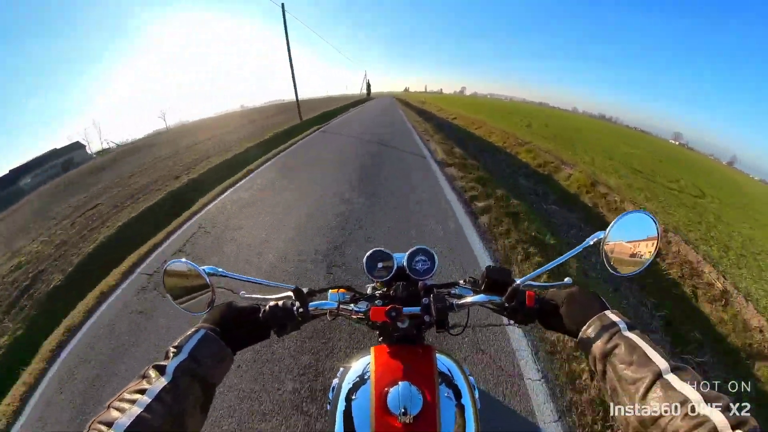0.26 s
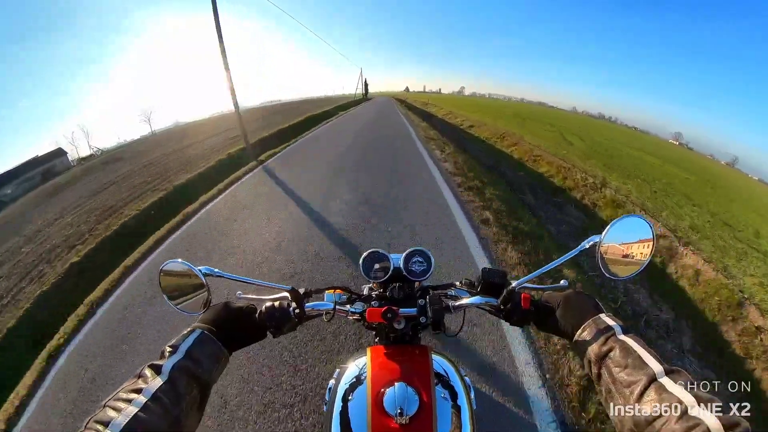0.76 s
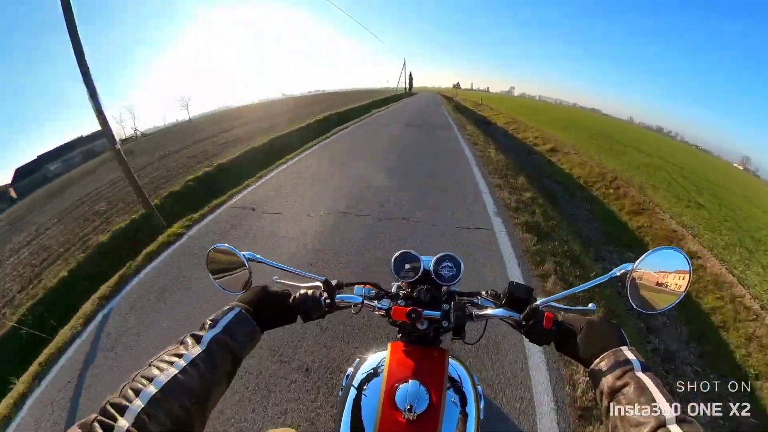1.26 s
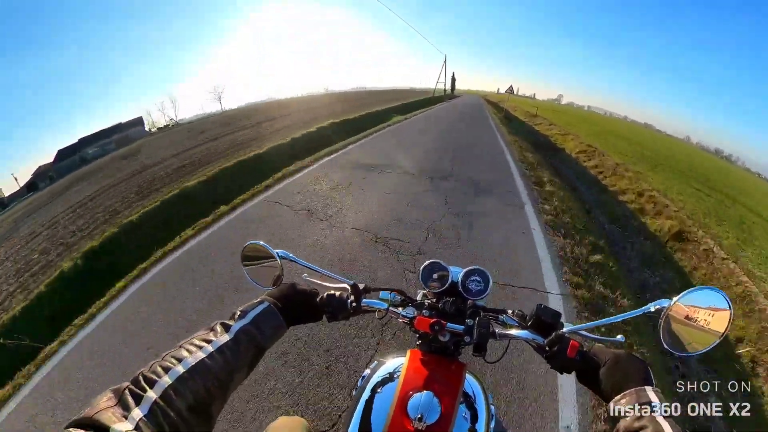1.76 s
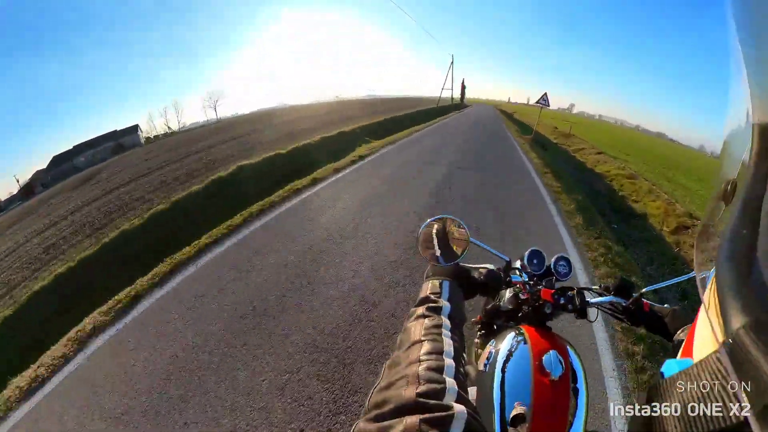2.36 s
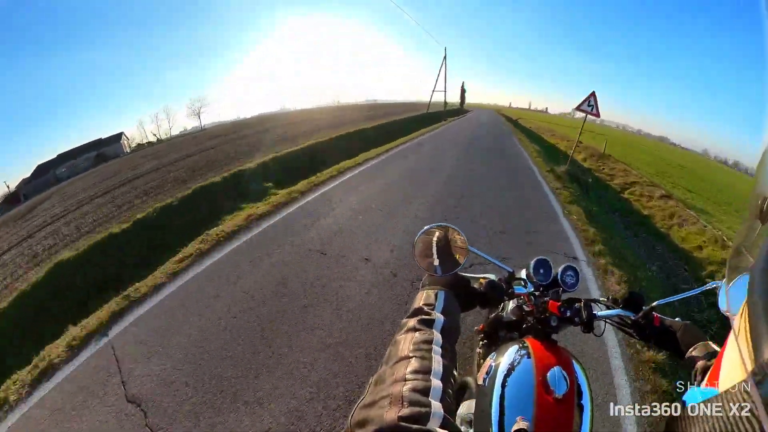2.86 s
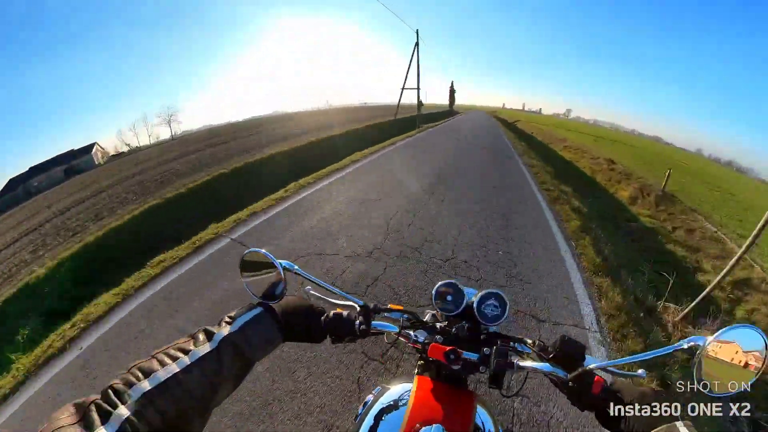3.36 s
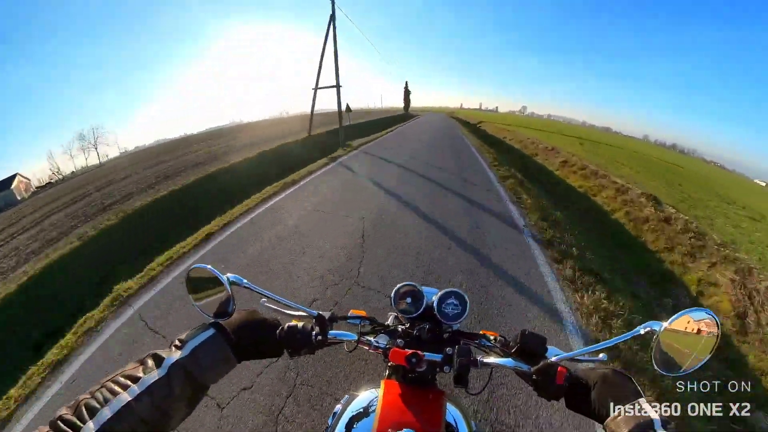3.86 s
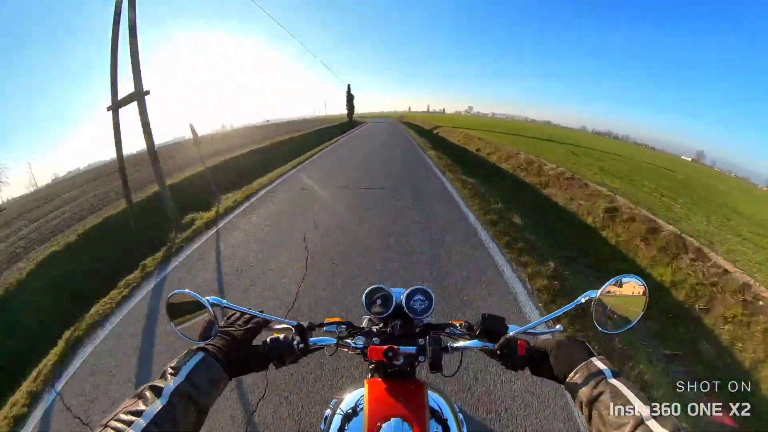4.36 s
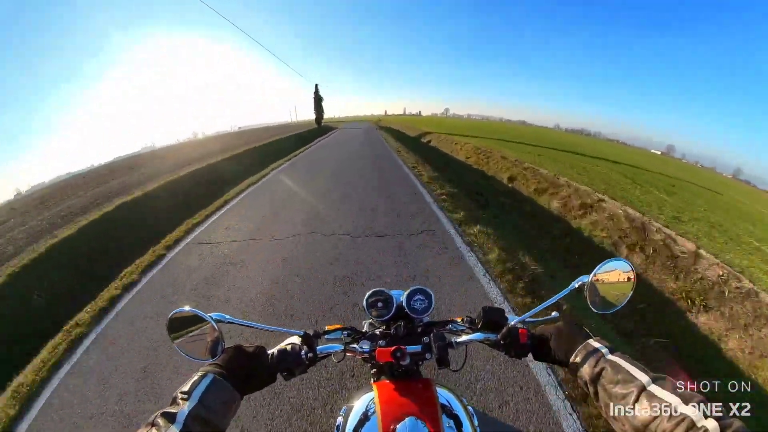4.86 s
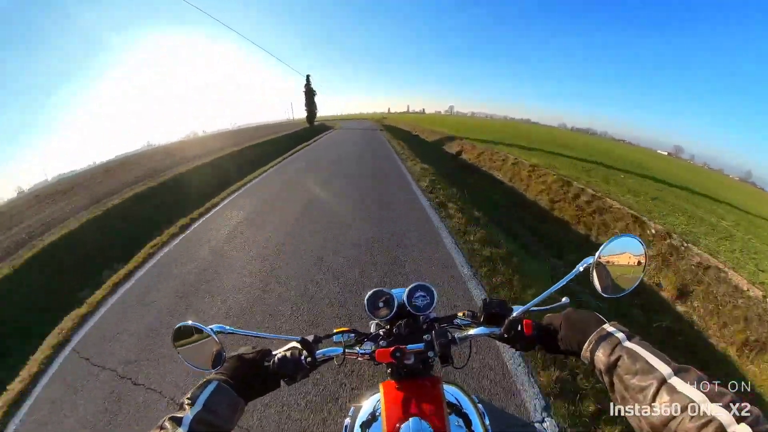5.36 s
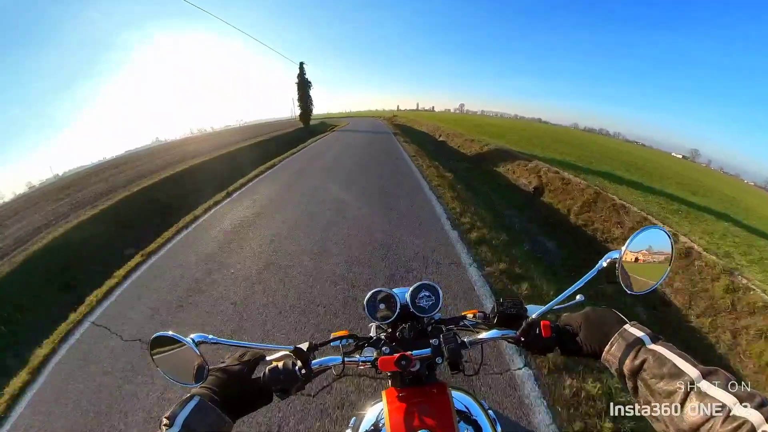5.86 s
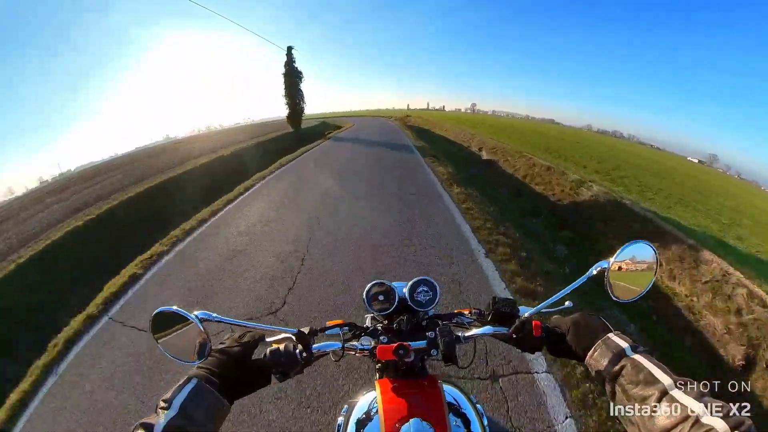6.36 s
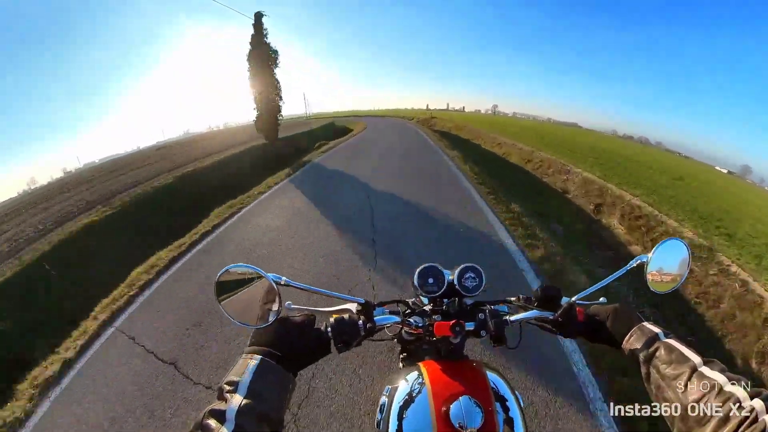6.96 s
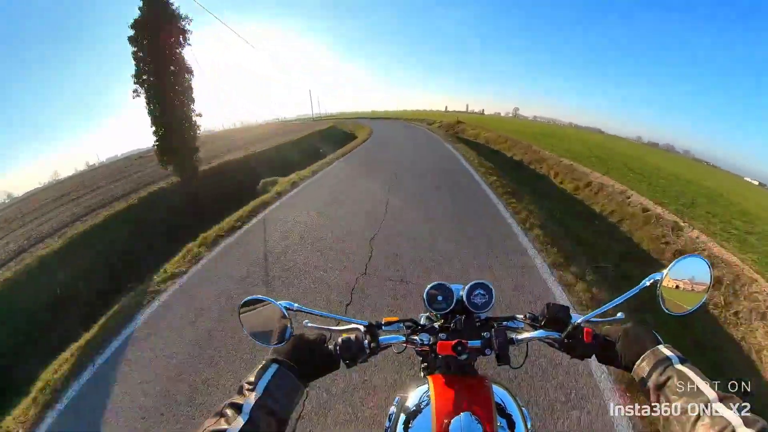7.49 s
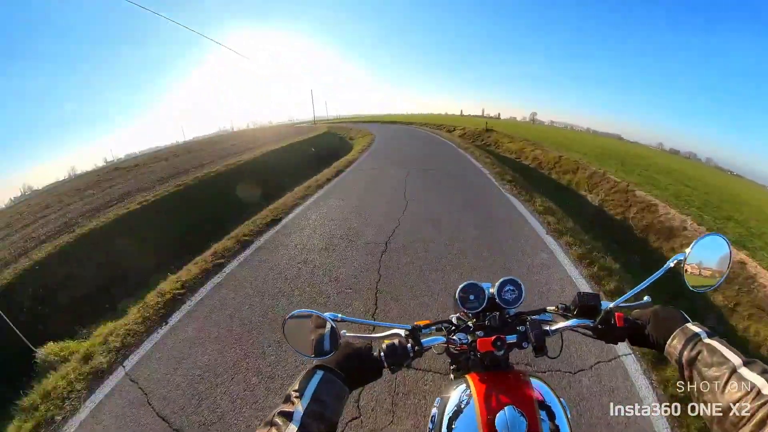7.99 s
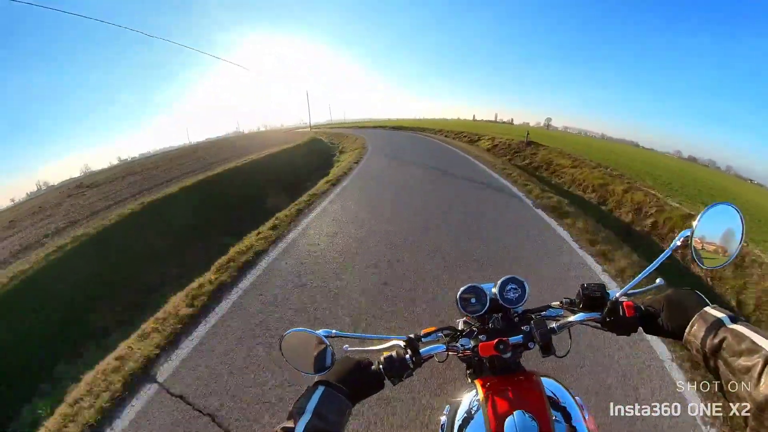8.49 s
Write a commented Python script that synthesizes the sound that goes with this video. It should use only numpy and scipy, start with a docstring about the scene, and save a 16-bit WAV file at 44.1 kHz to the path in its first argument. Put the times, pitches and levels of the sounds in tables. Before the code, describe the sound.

A rough, lumpy motorcycle engine dominates, close and dry outdoors, with rasping gas noise, metallic valve ticks and lumpy wind rumble. Early thumping burrs and momentary cut-outs break the beat. Jacket rustles and small snaps pass around two to three seconds as the engine rises. A gear change brings a quick drop, pops and scratchy squeaks, then a blip and a second pull with gear whine and pipe hum.

```python
"""A twin-cylinder motorcycle with open exhausts on a country road, heard from the rider's chest.
It pulls up through one gear, the throttle shuts, it pops through the shift and pulls again from low revs.
Each firing is a click that rings in the pipes; gas noise, valve ticks, gear whine, buzzes and a hum join it.
Shaped noise makes the wind on the microphone, the rustles and snaps, and a hissing edge above the whine.
Early on, short repeated bursts make the sound stutter, and it cuts out briefly several times."""
import sys
import numpy as np
from scipy import signal
from scipy.fft import rfft, irfft
from scipy.io import wavfile
from scipy.ndimage import uniform_filter1d, minimum_filter1d

SR = 44100
rng = np.random.default_rng(int(sys.argv[2]) if len(sys.argv) > 2 else 0)


def store_pcm(level_fs):
    """Save levels as 16-bit WAV."""
    pcm = np.round(np.clip(level_fs, -1, 1) * 32767).astype(np.int16)
    wavfile.write(sys.argv[1], SR, np.atleast_2d(pcm).T)


N = 384993

# level of the high rasp, which the other treble follows: start_s, level_db
RASP_LEVEL = [(0, -55), (1.15, -49), (1.6, -46), (2.25, -47.5), (2.8, -58.5), (3.55, -45), (3.9, -46),
              (4.2, -50), (4.68, -50), (5.05, -58), (5.65, -65.5), (6.3, -59.5), (6.65, -52.5),
              (6.95, -59.5), (7.4, -51), (8.05, -51.5), (8.4, -53), (8.73, -48)]
# the sound pauses, then carries on where it stopped: start_s, click_strength_db (before filtering)
CUT_TIMES = [(.3775, -22), (.618, -26), (.858, -21), (1.098, -23), (1.578, -22), (2.038, -29)]
CUT_S, CUT_DEPTH_DB = .02, -36


def from_db(db):
    """Turn decibels into a gain."""
    return 10 ** (np.asarray(db) / 20)


def rms_one(x):
    """Scale to an rms (average strength) of 1."""
    return x / np.sqrt(np.mean(x ** 2) + 1e-20)


def seconds():
    """The time of every sample."""
    return np.arange(N) / SR


def in_time(rows):
    """Draw straight lines between the points of a table, giving each column at every sample."""
    s, *columns = np.transpose(rows)
    return [np.interp(seconds(), s, c) for c in columns]


def butter(x, hz, kind, order=2):
    """Butterworth filter that runs forward in time."""
    return signal.sosfilt(signal.butter(order, hz, kind, fs=SR, output="sos"), x + 1e-18)


def noise(colour):
    """Noise of rms 1, shaped by a table of how strong each pitch is."""
    hz, db = np.transpose(colour)
    bin_hz = np.arange(N // 2 + 1) * SR / N
    gain = from_db(np.interp(np.log(bin_hz + 1), np.log(hz), db, left=-90, right=-90))
    return rms_one(irfft(rfft(rng.standard_normal(N)) * gain, N))


def drift(rate):
    """Random wandering of rms 1, with `rate` new values per second."""
    knots = rng.standard_normal(4000)
    return rms_one(np.interp(seconds() * rate, np.arange(len(knots)), knots))


def bell(s, half_length):
    """A smooth rise and fall of height 1, centred on s; half_length is its standard deviation."""
    t, out = seconds(), np.zeros(N)
    near = slice(*np.searchsorted(t, [s - 6 * half_length, s + 6 * half_length]))
    out[near] = np.exp(-.5 * ((t[near] - s) / half_length) ** 2)
    return out


def levelled(x):
    """Even out the level over a few engine cycles, keeping the single beats."""
    power = uniform_filter1d(uniform_filter1d(x * x, size=5000), size=5000)
    return x / np.sqrt(np.maximum(power, 1e-20))


def strokes(cycle, offset, unevenness, spread_db, jitter_s):
    """One click per engine cycle; uneven burning changes its strength and timing."""
    at = np.flatnonzero(np.diff(np.floor(cycle - offset)) > 0)
    chance = rng.standard_normal((len(at), 2)) * unevenness[at, None]
    moved = at + (chance[:, 1] * jitter_s * SR).astype(int)
    out = np.zeros(N)
    out[np.clip(moved, 0, N - 1)] = from_db(spread_db * chance[:, 0])
    return out


def harmonic(cycle, order):
    """A clean tone of rms 1 on a multiple of the engine speed."""
    return np.sqrt(2) * np.cos(2 * np.pi * order * cycle)


def blurred_tone(cycle, order, width_hz):
    """A tone that swings `order` times per cycle, smeared by slow noise over a band of pitches."""
    angle = 2 * np.pi * order * cycle
    blur = rms_one(butter(rng.standard_normal((2, N)), width_hz / 2, "low"))
    return blur[0] * np.sin(angle) + blur[1] * np.cos(angle)


def pauses():
    """1 while the sound is cut out, else 0."""
    t = seconds()
    return sum(1.0 * ((t >= s) & (t < s + CUT_S)) for s, _ in CUT_TIMES)


def wind():
    """Wind on the microphone: low noise whose strength is lumpy."""
    # level before the 8 dB lift below: start_s, level_db
    gusts = [(0, -34), (.35, -39), (.7, -33.5), (1.4, -31.5), (2.3, -36), (3.7, -35), (4.65, -33.5),
             (4.9, -30.5), (5.45, -33.5), (5.8, -36.5), (6.5, -36.5), (7.6, -32.5), (8.2, -35.5),
             (8.73, -32)]
    # spectrum: pitch_hz, level_db (per Hz)
    wind_colour = [(15, -18), (28, -6.5), (45, -5.5), (80, -1.5), (150, -5), (280, -13.5), (400, -19),
                   (700, -25.5), (1500, -42)]
    level_db = in_time(gusts)[0] + 8.0 + 1.3 * drift(14)
    return from_db(level_db) * noise(wind_colour)


def rustles_and_snaps():
    """Bright noise let through in grainy swells and in very short, sharp bursts."""
    # rustles, mostly the rider's jacket, and a hissing edge above the gear whine (7.003 s):
    # middle_s, half_length_s, level_db (before the grain)
    rustle_times = [(0.64, 0.16, -62), (2.316, 0.13, -59), (3.138, 0.077, -58), (6.683, 0.026, -59.5),
                    (7.003, 0.47, -64.5)]
    # short sharp snaps, the click of the gear change, and bright flicks over the whine (from 7.352 s):
    # middle_s, half_length_s, level_db
    snap_times = [(2.162, .0012, -52), (2.312, .004, -59), (2.421, .002, -52), (2.487, 0.0015, -43.5),
                  (2.546, 0.0017, -51), (3.278, 0.0014, -47), (4.463, 0.0022, -54), (5.167, 0.0026, -47),
                  (7.352, .004, -58), (7.538, .004, -54), (7.583, .002, -56)]
    # spectrum of the bright noise: pitch_hz, level_db (per Hz)
    bright_colour = [(2500, -14), (3800, 1), (4600, 1.5), (5500, 7), (6300, -2), (6900, -9), (7600, -31.5),
                     (10000, -42)]
    bright = noise(bright_colour)
    grain = from_db(3.5 * drift(170))
    rustles = grain * sum(from_db(db) * bell(s, half) for s, half, db in rustle_times)
    snaps = sum(from_db(db) * bell(s, half) for s, half, db in snap_times)
    return bright * (rustles + snaps)


def squeaks():
    """Short gliding tones, made scratchy by a fast random waver of pitch and level."""
    # faint chirps as the rider turns, and squeaks at the bottom of the shift:
    # middle_s, half_length_s, pitch_hz, glide_hz_per_s, peak_db (before the flutter)
    squeak_times = [(2.312, .005, 4500, -45000, -49), (2.335, .006, 4500, 30000, -53),
                    (2.352, .007, 4700, -25000, -55), (2.368, .01, 4150, 8000, -52),
                    (5.657, 0.026, 2340, -2000, -61.5), (5.714, 0.023, 2260, -1000, -62),
                    (5.802, .028, 2220, 1802, -61), (5.855, 0.02, 2480, 2502, -52),
                    (5.931, .018, 2820, 3502, -57), (5.976, 0.016, 3040, 2006, -57)]
    t = seconds()
    waver = 1.0 * drift(420)   # radians
    flutter = from_db(3 * drift(110))
    out = 0
    for s, half, hz, glide, db in squeak_times:
        age = t - s
        turns = (hz + .5 * glide * age) * age
        out = out + from_db(db) * bell(s, half) * np.sin(2 * np.pi * turns + waver)
    return flutter * out


def stutters():
    """One thump with its grit repeats in a rapid burr; also returns the engine's gain, which drops meanwhile."""
    # bursts: start_s, repeats, rate_hz, thump_db, grit_db
    burr_times = [(.496, 2, 80.3, -8.5, -33.5), (.534, 4, 330, -16.5, -33), (0.5491, 4, 293.5, -8, -33),
                  (0.5669, 2, 119, -4.5, -34), (.658, 4, 301, -17.5, -32), (1.208, 2, 118.3, -6.5, -26.5),
                  (1.3212, 2, 61.6, -11, -30.5), (1.364, 3, 93.6, -5.5, -28.5), (1.4068, 1, 114, -5.5, -33),
                  (1.415, 2, 114.5, -1, -27), (1.4322, 1, 110, -8, -32.5), (1.561, 2, 101.3, -11, -37)]
    # spectrum of the grit: pitch_hz, level_db (per Hz)
    grit_colour = [(300, 4), (600, 9.5), (1000, 3), (1400, 0), (2000, -14.5), (3000, -12), (3500, -11.5),
                   (4200, -41)]
    thump_hz, thump_half_s, duck_db = 217, 0.0028, -11
    out, held, grit = np.zeros(N), np.zeros(N), noise(grit_colour)
    for s, repeats, rate_hz, db, grit_db in burr_times:
        period = int(SR / rate_hz)
        at = int(s * SR) - period // 2
        age = (np.arange(period) - period // 2) / SR
        swell = np.exp(-.5 * (age / thump_half_s) ** 2)
        thump = -np.sin(2 * np.pi * max(thump_hz, rate_hz) * age) * swell
        if rate_hz < thump_hz:   # slow burrs are separate thumps
            thump = thump * signal.windows.tukey(period, .3)
        smooth = from_db(db) * (thump - thump.mean())
        rough = from_db(grit_db) * grit[at:at + period] * (.5 + swell)
        burr = np.tile(smooth + rough, round(repeats))
        out[at:at + len(burr)] += burr
        held[at:at + len(burr)] = 1
    giving_way = uniform_filter1d(from_db(duck_db * held), size=130)
    return butter(out, 3850, "low", order=6), giving_way


def gear_whine(turning, flare):
    """Gears whine at 233 times the cycle rate, blurred, and swell with each firing."""
    # level before the drift and the swelling: start_s, level_db
    whine_level = [(0, -61.5), (.9, -61), (1.25, -68.5), (1.8, -70), (2.3, -85), (6.25, -85.5), (6.45, -61),
                   (7.4, -57.5), (8.1, -57), (8.73, -61.5)]
    level = from_db(in_time(whine_level)[0] + 3 * drift(45))
    return level * blurred_tone(turning, order=233, width_hz=390) * (.24 + 2.5 * flare)


def valve_ring(modes):
    """One metal contact: each tone swells within about a millisecond and dies."""
    t = np.arange(SR // 50) / SR
    ring = 0
    for hz, rise_s, db in modes:
        swell = (t / rise_s * np.exp(1 - t / rise_s)) ** 2
        ring = ring + from_db(db) * np.sin(2 * np.pi * hz * t) * swell
    return butter(ring, 3900, "low", order=8)


def valves(cycle, tick_db):
    """The valve gear ticks lightly once a cycle, and now and then clacks at its own set strength."""
    # clacks, mostly near the firings, some repeating quickly in the stutter:
    # time_s, clank_strength_db (dull), ping_strength_db (bright)
    clack_times = [(0.03, -34, -30.5), (.483, -45, -34), (.674, -36, -27), (.719, -22, -39),
                   (.939, -43, -32), (1.018, -29, -32), (1.17, -36, -36), (1.284, -37, -36),
                   (1.319, -25, -32), (1.335, -25, -32), (1.351, -21, -31), (1.404, -34, -31),
                   (1.474, -36, -38), (1.541, -30, -33), (1.558, -20.5, -29), (1.603, -25, -28),
                   (1.645, -26, -24), (1.686, -41, -28), (1.727, -28, -29), (1.768, -39, -28),
                   (1.883, -28, -31), (1.924, -30, -33), (2.003, -21, -27.5), (2.104, -37, -31),
                   (2.144, -30, -37), (2.182, -24, -27), (2.223, -30, -38), (2.264, -29, -46),
                   (2.459, -35, -32), (2.576, -43, -34), (3.068, -40, -34), (3.289, -31, -39),
                   (3.325, -22, -50), (3.433, -30, -33.5), (3.471, -27, -39), (3.578, -26, -42),
                   (3.651, -31, -29), (3.688, -20, -35), (3.758, -30, -39), (3.795, -24, -47),
                   (3.83, -29, -42), (3.865, -30, -35), (3.973, -31, -54), (4.184, -29, -51),
                   (4.289, -28, -38), (4.463, -25, -41), (4.638, -40, -52.5), (6.525, -26, -47),
                   (6.705, -30, -41), (7.219, -39, -34), (7.449, -22, -45), (7.541, -32, -35),
                   (7.587, -22, -30), (7.77, -44, -31), (7.816, -27, -44), (7.862, -30, -35),
                   (7.907, -23, -49), (7.954, -36, -32), (7.998, -26, -36), (8.09, -24, -32),
                   (8.224, -28, -38), (8.314, -29, -37.5), (8.542, -28, -36), (8.586, -35, -34),
                   (8.629, -24.5, -35), (8.715, -28, -45)]
    # tones of the dull clank: pitch_hz, time_to_peak_s, level_db
    clank_modes = [(1420, .0012, -1), (1740, 0.00097, -9.5), (2260, .0009, -9)]
    # tones of the bright ping: pitch_hz, time_to_peak_s, level_db
    ping_modes = [(2970, 0.00082, -3.5), (3230, 0.0012, -0.5)]
    s, clank_db, ping_db = np.transpose(clack_times)
    light = from_db(in_time(RASP_LEVEL)[0] + tick_db)
    out = 0
    for modes, hard_db in (clank_modes, clank_db), (ping_modes, ping_db):
        hard = np.zeros(N)
        hard[((s - .001) * SR).astype(int)] = from_db(hard_db)   # contact 1 ms before the table time
        free = minimum_filter1d(1.0 * (hard == 0), size=1000)   # no light tick close to a clack
        taps = strokes(cycle, -.012, np.ones(N), spread_db=1.6, jitter_s=.0004)
        out = out + signal.oaconvolve(hard + free * light * taps, valve_ring(modes))[:N]
    return out


def buzzes_and_hum(flare):
    """Loose parts ring in sympathy, and the pipes hum at 454 Hz, shaken by each firing."""
    # buzzing parts, and the hum of the pipes (454 Hz):
    # middle_s, half_length_s, pitch_hz, width_hz, level_db (before the shaking)
    buzz_times = [(3.7, 0.29, 2250, 320, -47), (3.62, .25, 1400, 320, -43.5),
                  (3.56, 0.12, 2950, 550, -44.5), (4.74, .25, 2260, 180, -53),
                  (4.58, .22, 2990, 130, -51.5), (4.9, 0.18, 2980, 210, -60),
                  (6.45, 0.089, 1400, 220, -43.5), (6.9, .6, 940, 60, -51), (7.5, .3, 1650, 140, -46.5),
                  (7.444, 0.37, 3040, 260, -55.5), (7.3, 0.67, 454, 16, -36.5),
                  (8.686, 0.099, 930, 60, -41)]
    t = seconds()
    ringing = sum(from_db(db) * bell(s, half) * blurred_tone(t, hz, width)
                  for s, half, hz, width, db in buzz_times)
    return ringing * (0.64 + 1.6 * flare)


def pops():
    """Each knock or exhaust pop is a pressure kick that dies within about two swings."""
    # start_s, strength_db (before the treble is softened), pitch_hz
    pop_times = [(.766, -1, 814), (.921, -21, 1020), (1.268, -22, 920), (1.4425, -13, 890),
                 (1.502, -20.5, 870), (5.281, -26, 940), (5.401, -13, 500), (5.432, -23, 810),
                 (5.457, -17.5, 470), (8.464, -23, 940)]
    out, t = np.zeros(N), np.arange(2000) / SR
    for s, db, hz in pop_times:
        age = t * hz / 1.08
        kick = -np.sin(2 * np.pi * hz * t) * (age * np.exp(1 - age)) ** 3
        at = int(s * SR)
        out[at:at + len(t)] += from_db(db) * kick
    return butter(out, 1700, "low", order=4)


def puffs(clicks, decay_s):
    """Each click swells quickly and dies away."""
    fading = signal.lfilter([1], [1, -np.exp(-1 / (decay_s * SR))], clicks + 1e-18)
    return butter(fading, 350, "low")


def flaring(cycle, throttle):
    """A curve that jumps up with each firing, the more so under load; it drives the noises."""
    firings = strokes(cycle, -.06, np.ones(N), spread_db=2, jitter_s=.0004)
    leading = strokes(cycle, -.38, np.ones(N), spread_db=2, jitter_s=.0004)
    return throttle * puffs(firings + 0.35 * leading, decay_s=0.0079)


def rasp(flare):
    """Gas noise in three registers that swell together and flare with each firing."""
    # spectra of the three registers: pitch_hz, level_db (per Hz)
    low_colour = [(350, -19.5), (600, 3.5), (750, 0), (950, -1), (1150, -5.5), (1400, -1), (1750, -6),
                  (2100, -14), (3000, -50)]
    high_colour = [(1500, -31), (1950, -8), (2230, 0), (2550, -1.5), (2950, 0), (3350, -6.5), (3700, -12.5),
                   (4600, -42)]
    sizzle_colour = [(3000, -28), (3800, 6), (4600, 0), (5400, 2.5), (6200, -4), (7000, -17.5), (8000, -35),
                     (15000, -36.5)]
    high_db, = in_time(RASP_LEVEL)
    swing_db = high_db - high_db.mean()
    # low rasp and sizzle: mean level in dB, plus a share of the high rasp's swing
    low_db = -42 + 0.79 * swing_db + 1.4 * drift(90)
    sizzle_db = -66.5 + 0.81 * swing_db + 2.2 * drift(90)
    low = from_db(low_db) * levelled(noise(low_colour) * (1 + 3.2 * flare))
    high = from_db(high_db + 1.6 * drift(90)) * levelled(noise(high_colour) * (1 + 3.4 * flare))
    sizzle = from_db(sizzle_db) * levelled(noise(sizzle_colour) * (1 + 4.5 * flare))
    return low + high + sizzle


def resonate(x, modes):
    """Resonances side by side, with alternating signs."""
    out = 0
    for k, (hz, width, db) in enumerate(modes):
        r = np.exp(-np.pi * width / SR)
        poles = [1, -2 * r * np.cos(2 * np.pi * hz / SR), r * r]
        ringing = (1 - r * r) / 2 * signal.lfilter([1, 0, -1], poles, x + 1e-18)
        out = out + (-1) ** k * from_db(db) * ringing
    return out


def pipe(clicks, modes, heat):
    """Resonances side by side, with alternating signs, whose pitch follows the heat of the gas."""
    out, turns = 0, np.cumsum(heat) / SR
    for k, (hz, width, db) in enumerate(modes):
        r = np.exp(-np.pi * width / SR)
        angle = (2 * np.pi * (hz * turns % 1)).astype(np.float32)
        spin = np.cos(angle) + 1j * np.sin(angle)
        # smooth the clicks in a frame that turns with the mode, then turn back
        ringing = spin * signal.lfilter([2 * (1 - r)], [1, -r], clicks * spin.conj() + 1e-18)
        out = out + (-1) ** k * from_db(db) * (ringing.real - width / (2 * hz) * ringing.imag)
    return out


def exhaust(cycle, throttle):
    """Two cylinders fire about 270 crank degrees apart, each into its own pipe; the airbox gulps afterwards."""
    # resonances of the two pipes and the airbox: pitch_hz (pipes: before heat), width_hz, level_db
    lead_modes = [(145, 66, -1.5), (247, 47, -20), (500.6, 52, -3.5), (395.5, 33, -4.5)]
    trail_modes = [(126, 68, 1.5), (269, 109, -6), (461, 35.4, -2.5), (416.5, 56, -5.5), (534, 76, -10)]
    airbox_modes = [(50, 47, -6.5), (98, 100, -28.5)]
    # the pipes ring higher as the gas gets hotter: start_s, pitch_factor (before a small wander)
    gas_heat = [(0, 1.003), (1.8, 1.025), (2.9, 0.99), (3.8, 1.003), (4.7, 0.99), (5.7, 0.977), (7, 0.95),
                (8.73, 1.077)]
    # a pipe booms as an engine order meets its standing wave: middle_s, half_length_s, order, level_db
    boom_times = [(1.33, .22, 5, -29.5), (4.05, .3, 2, -35.5), (4.83, .045, 3, -23), (5.5, .05, 3, -22),
                  (5.08, 0.024, 3, -22), (6.2, 0.036, 5, -30.5), (5.41, 0.024, 5, -27.5),
                  (4.9, 0.1, 8, -36), (5.2, 0.04, 5, -27), (6.028, 0.14, 3, -34), (6.195, 0.54, 5, -31.5),
                  (8, 0.87, 5, -32.5), (8.3, 0.87, 8, -29.5), (4.4, 0.43, 13, -38)]
    shut = 1 - throttle
    unevenness = 1 + .7 * shut ** 3
    lead = strokes(cycle, -.365, unevenness, spread_db=.7, jitter_s=.00007)
    trail = strokes(cycle, 0, unevenness, spread_db=.7, jitter_s=.00007)
    gulp = strokes(cycle, .352, unevenness, spread_db=1.0, jitter_s=0.00014)
    heat = in_time(gas_heat)[0] + 0.011 * drift(12)
    pipes = pipe(lead, lead_modes, heat) + pipe(trail, trail_modes, heat)
    pipes = pipes + resonate(gulp, airbox_modes)
    # the bark brightens for a while in the pull
    blare = from_db(-39) * bell(2.95, 0.49) * levelled(butter(pipes, [590, 700], "band"))
    pipes = butter(pipes, 573, "low", order=5)   # the valves open gradually
    thump = signal.sosfiltfilt(signal.butter(4, 350, fs=SR, output="sos"), pipes)
    bark = pipes - thump
    booms = sum(from_db(db) * bell(s, half) * harmonic(cycle, round(order))
                for s, half, order, db in boom_times)
    # as the throttle shuts, the bark fades first
    thump_db = -19 - 16 * shut ** 2
    bark_db = -27 - 20 * shut
    return booms + blare + from_db(thump_db) * levelled(thump) + from_db(bark_db) * levelled(bark)


def scene():
    """Engine, gears, rider and wind at one microphone."""
    # engine speed: start_s, speed_cycles_per_s (four-stroke cycles)
    engine_speed = [(0, 21.06), (.62, 21.95), (1.86, 24.8), (2.4, 25.62), (3.5, 27.66), (4.75, 29.09),
                    (5.07, 21.66), (5.21, 23.37), (5.42, 20.78), (5.62, 17.01), (5.78, 16.22),
                    (5.98, 21.89), (6.5, 21.21), (7.4, 21.64), (8.2, 22.2), (8.73, 23.3)]
    # the beat stumbles ahead while the sound stutters: start_s, gained_cycles
    stumble = [(.769, 0), (.805, .18), (.85, .16), (.943, .52), (1.023, .7), (1.174, .67), (1.209, .87),
               (1.288, 1), (1.477, 1.55), (1.545, 1.92), (1.772, 1.88), (1.806, 2)]
    # throttle: start_s, opening_0_to_1
    throttle_opening = [(0, 0.66), (.5, 0.75), (1.7, 0.87), (4.72, 0.8), (4.82, 0.38), (5.07, 0.31),
                        (5.2, 0.62), (5.3, 0), (5.75, 0), (5.97, 0.35), (6.2, 0.07), (6.62, 0.61),
                        (7.35, 0.71), (8.2, 0.58), (8.73, 0.71)]
    speed, = in_time(engine_speed)
    turning = np.cumsum(speed * (1 - pauses())) / SR + .35   # cycles so far
    cycle = turning + in_time(stumble)[0]
    throttle = np.clip(in_time(throttle_opening)[0], 0, 1)
    flare = flaring(cycle, throttle)
    # light valve tick over the rasp, in dB: less above 15 cycles per s, less with the throttle shut
    tick_db = 13 - 1 * np.maximum(speed - 15, 0) - 15.5 * (1 - throttle) ** 2
    engine = exhaust(cycle, throttle) + rasp(flare) + buzzes_and_hum(flare)
    burrs, giving_way = stutters()
    machine = engine * giving_way + burrs + valves(cycle, tick_db) + gear_whine(turning, flare) + pops()
    return (machine + squeaks() + rustles_and_snaps() + wind())[None]


def record(dry):
    """The sound cuts out for moments with a thin click at each edge, over a faint hiss; the top is cut."""
    # spectrum of the hiss: pitch_hz, level_db (per Hz)
    hiss_colour = [(3000, 5), (8000, -2.5), (12500, -1.5), (15500, -12.5)]
    clicks = np.zeros(N)
    for s, click_db in CUT_TIMES:
        edges = [int(s * SR), int((s + CUT_S) * SR)]
        clicks[edges] = from_db(click_db) * rng.choice([-1, 1], 2)
    clicks = 3.23 * butter(clicks, [1000, 7000], "band", order=1)
    cut_gain = uniform_filter1d(from_db(CUT_DEPTH_DB * pauses()), size=30)
    dip_gain = from_db(-13 * bell(6.553, .006))   # the level dips once, briefly
    hiss = from_db(-83.5) * noise(hiss_colour)
    out = np.clip(dry * cut_gain * dip_gain + clicks + hiss, -1, 1)
    return signal.sosfilt(signal.cheby2(12, 70, 17000, fs=SR, output="sos"), out)


dry = scene()
out = record(dry)
store_pcm(out)
```